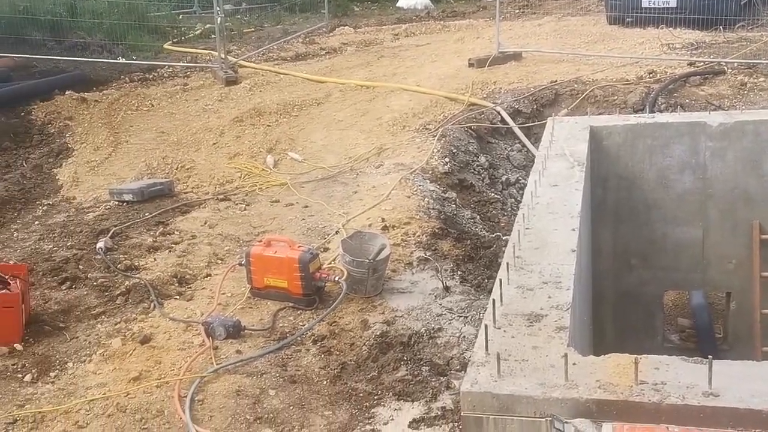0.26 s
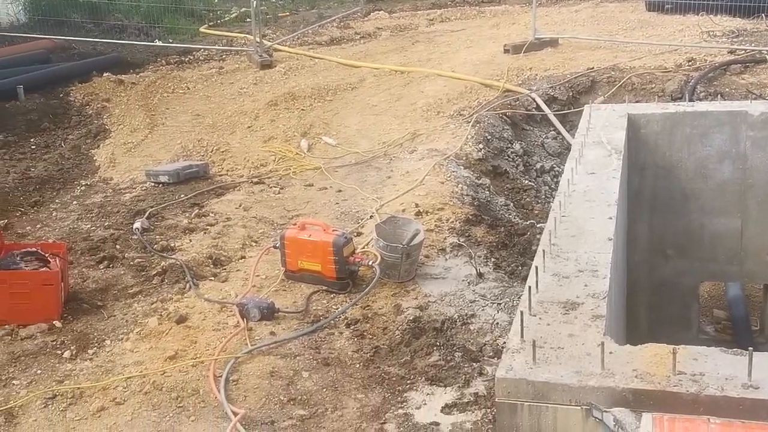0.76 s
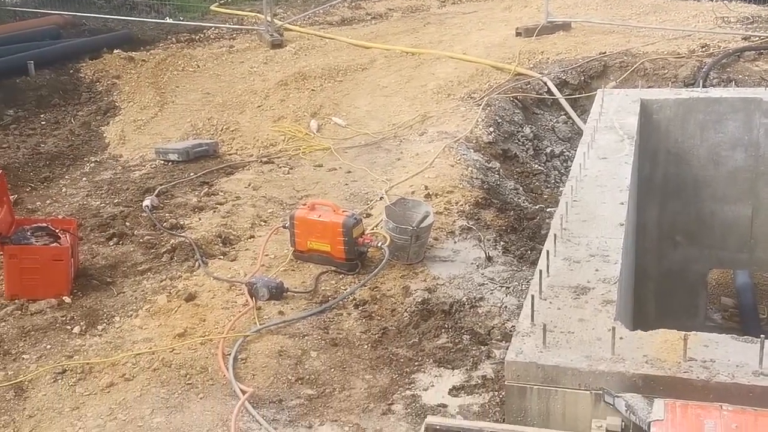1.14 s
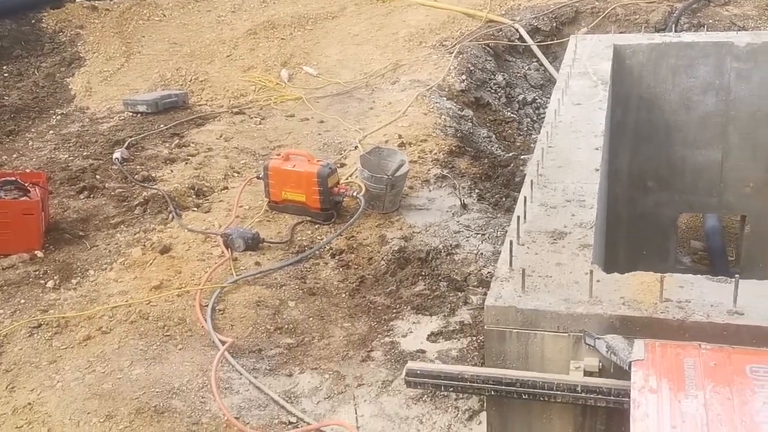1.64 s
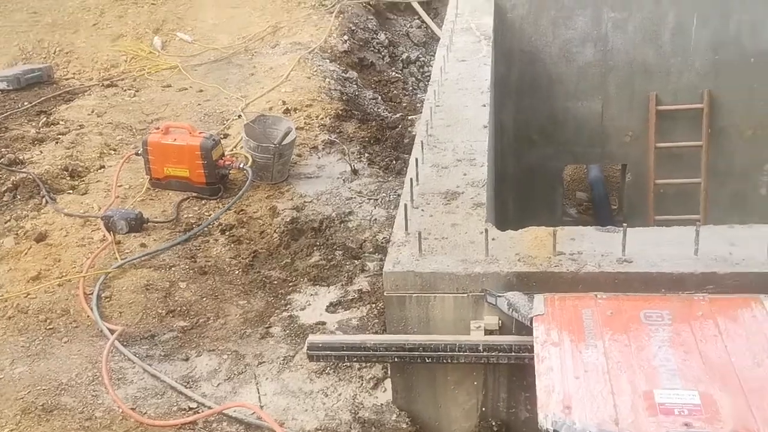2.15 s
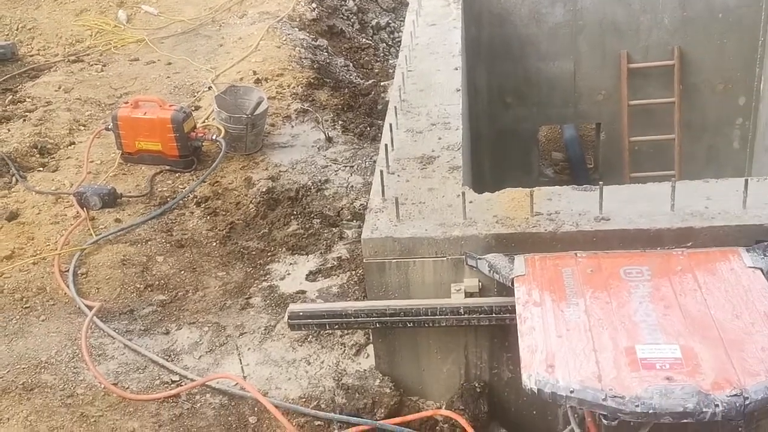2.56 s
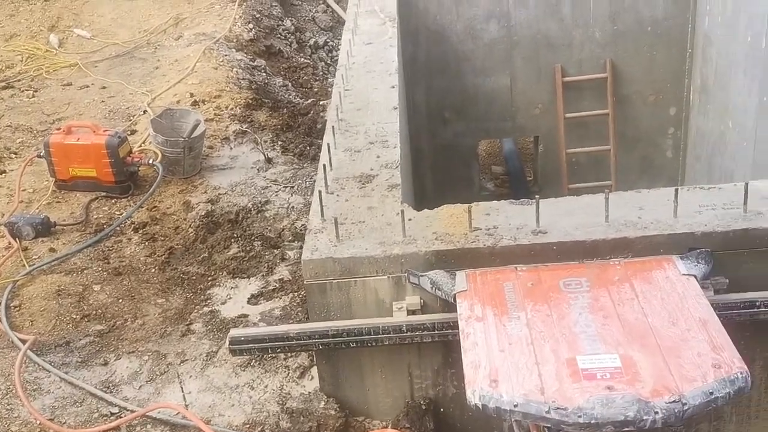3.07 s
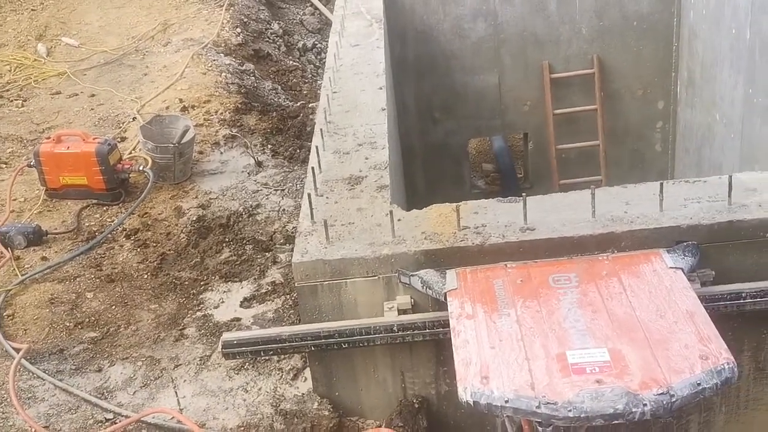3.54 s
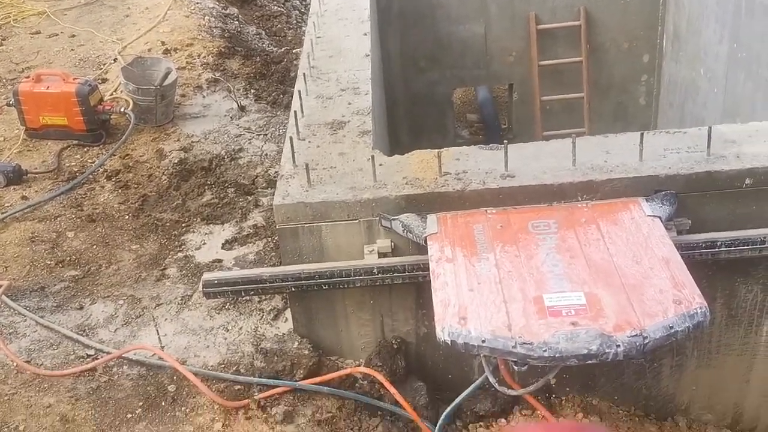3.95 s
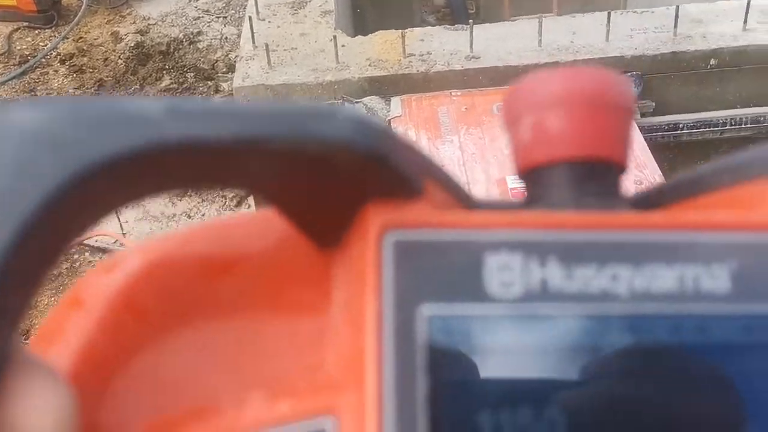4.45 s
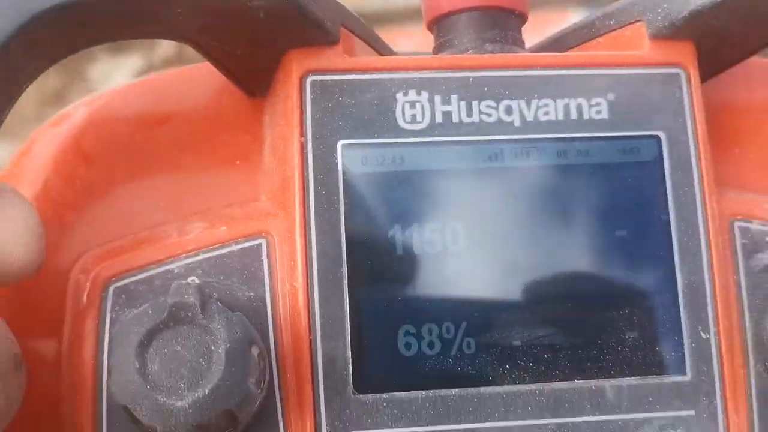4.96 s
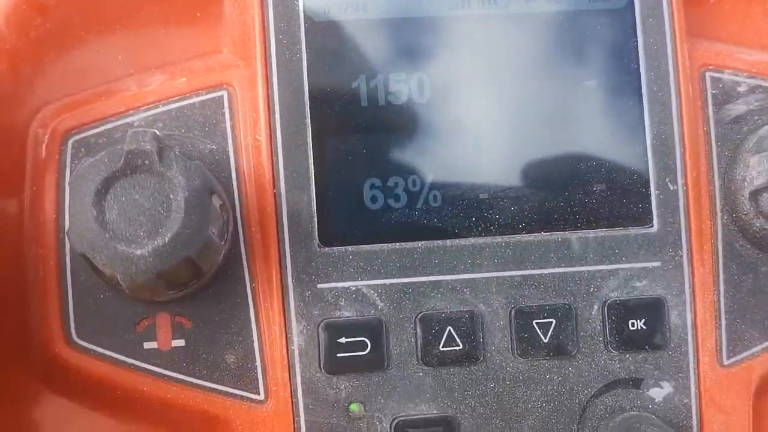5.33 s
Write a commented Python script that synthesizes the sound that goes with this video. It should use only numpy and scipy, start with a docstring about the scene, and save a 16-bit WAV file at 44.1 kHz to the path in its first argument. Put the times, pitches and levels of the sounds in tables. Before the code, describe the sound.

A powered wall saw is already cutting concrete and never stops. Its dense, bright grinding hiss is strongest in the upper mids, with thin metallic whines and a quick flutter about twenty times a second. Near two seconds it swells slightly under load with a few faint low clicks, then gradually eases, becoming more tonal and ringing. Outdoors, hand-held stereo phone, close and loud, slightly overloaded, with a barely audible low breeze.

```python
"""Outdoors, a wall saw cuts concrete, heard through the two ports of a hand-held phone.
The blade meets nearly the same grit every turn, so its hiss repeats with the rotation and rings in the steel.
Tones at whole multiples of the turn and a gear tone whine on top; a proud segment scrapes and pings each turn.
The loud hiss bends the microphones, which adds difference tones, low pulses and clicks. A low breeze lies beneath."""
import sys
import numpy as np
from scipy import signal
from scipy.fft import rfft, irfft, next_fast_len
from scipy.io import wavfile
from scipy.ndimage import uniform_filter1d

SR = 44100
rng = np.random.default_rng(int(sys.argv[2]) if len(sys.argv) > 2 else 0)


def output_pcm(signal):
    """Save a mono or channel-first signal as 16-bit PCM at the path in sys.argv[1].

    Samples are clipped to [-1, 1] before scaling.
    """
    pcm = np.clip(np.atleast_2d(signal).T, -1, 1) * 32767
    wavfile.write(sys.argv[1], SR, np.round(pcm).astype(np.int16))


def rack_gain(trim_db):
    """Turn a fader trim in dB into the linear factor to multiply a signal by."""
    fader = np.asarray(trim_db, float)
    return 10 ** (fader / 20)


N = 246959
T = np.arange(N) / SR  # time, s
FREE_TURNS_PER_S = 19.53  # blade speed without load


def read(hz, at_hz, values):
    """Spectral interpolation: straight lines between points on a log-frequency axis."""
    return np.interp(np.log(hz + 1), np.log(np.add(at_hz, 1)), values)


def evened(x):
    """Normalization of power: scales to rms 1."""
    return x / np.sqrt(np.mean(x ** 2))


def wander(rate_hz):
    """Low-frequency random modulation of rms 1: sines of random phase, the slower ones stronger."""
    steps = np.arange(0, N / SR + 1, .01)
    total = np.zeros(len(steps))
    for hz in np.geomspace(rate_hz / 8, rate_hz, num=24):
        total += np.sin(2 * np.pi * (hz * steps + rng.random())) / np.sqrt(hz)
    return np.interp(T, steps, evened(total))


# Course of the cut. Each row: time in seconds, level in dB, gear whine in dB.
RUN_LEVELS = [(0, -19.5, -40), (0.2, -20, -41.5), (0.9, -19.5, -41), (1.75, -19.5, -46), (1.92, -17.5, -47),
              (2.2, -18, -46.5), (2.4, -18, -48.5), (2.7, -18.5, -52), (3.5, -19.5, -66), (4.2, -20.5, -69),
              (4.6, -22, -51.5), (5.6, -23.5, -45.5)]


def run_level(column):
    """Amplitude envelope: one column of the run, interpolated sample by sample."""
    return np.interp(T, *np.transpose(RUN_LEVELS)[[0, column]])


# How the phone is held. Each row: time in seconds, number of the pose (0 to 3).
POSE_TIMES = [(0, 0), (1.7, 0), (1.95, 1), (2.6, 1), (3.15, 2), (4.0, 2), (4.55, 3), (5.6, 3)]


def pose_share(k):
    """Linear crossfade: how much of pose k is held at each moment, 0-1."""
    return np.maximum(1 - abs(np.interp(T, *np.transpose(POSE_TIMES)) - k), 0)


def pose_db(dbs):
    """Directional level: the dB of the four poses, crossfaded sample by sample."""
    return sum(pose_share(k) * db for k, db in enumerate(dbs))


# Phase between the ports. Each row: frequency in Hz, then the lead of the left port in radians in each pose.
PORT_LEADS = [(2300.0, -0.6, -0.2, -0.2, -0.1), (3200.0, -0.4, -0.1, -0.2, 0.3),
              (4200.0, 0.6, 0.7, 0.4, 1.3), (4800.0, 1.9, 1.3, 0.8, 1.2), (5300.0, 3.4, 4.1, -1.7, 1.9),
              (6200.0, 3.8, 4.3, -2.0, 1.3), (7000.0, 3.6, 4.2, -1.8, 0.2), (7600.0, 4.9, 5.4, -1.2, -0.0),
              (8300.0, 5.2, 5.6, -0.5, 0.1), (10500.0, 5.0, 6.1, -0.2, 1.9), (12500.0, 6.0, 6.5, 0.5, 2.9),
              (15000.0, 3.3, 6.3, 0.0, 3.1)]


def port_lead(hz, k):
    """Phase difference between two receivers: radians by which the left port leads in pose k."""
    return read(hz, *np.transpose(PORT_LEADS)[[0, k + 1]])


# Load drags the blade down. Each row: time in seconds, blade speed in turns per second.
BLADE_SPEED = [(0, 19.52), (0.5, 19.545), (1.1, 19.5), (1.8, 19.5), (2.25, 19.24), (2.45, 19.24),
               (2.75, 19.38), (3.5, 19.38), (4.06, 19.44), (5.6, 19.515)]


def blade_speed():
    """Rotation under load: turns per second at every sample."""
    return np.interp(T, *np.transpose(BLADE_SPEED))


def repeat():
    """Coherence between turns: the harder the load drags and shifts the speed, the less grit comes round again."""
    free, lost_per_sag2, lost_per_ramp = .76, 1.2, .3  # sag in turns/s, ramp in turns/s^2
    speed = uniform_filter1d(blade_speed(), size=4000)
    sag = FREE_TURNS_PER_S - speed
    ramp = abs(np.gradient(speed) * SR)
    loaded = free - lost_per_sag2 * sag ** 2 - lost_per_ramp * ramp
    settled = np.interp(T, [4.1, 4.5], [0, 1])  # the feed eases and the blade keeps to its groove
    return loaded + settled * (.95 - loaded)


def grit(turns, size=8192, count=820):
    """Cyclostationary noise: laid around the rim, each turn keeps part of the last turn's pattern."""
    rows = int(turns[-1]) + 2
    rim_spectra = rng.standard_normal((rows, count, 2)) @ [1, 1j]
    keep = np.clip(np.interp(np.arange(rows), turns, repeat()), .05, 1)
    fineness_of_bump = np.arange(1, count + 1) / 260
    keep = keep[:, None] ** fineness_of_bump ** .5  # coarse bumps outlast fine grit
    for k in range(1, rows):
        renewed = np.sqrt(1 - keep[k] ** 2) * rim_spectra[k]
        rim_spectra[k] = keep[k] * rim_spectra[k - 1] + renewed
    rim = irfft(rim_spectra, size).ravel()
    return evened(np.interp(turns * size, np.arange(len(rim)), rim))


# Spectrum of the breeze before scaling to rms 1. Each row: frequency in Hz, relative density in dB per Hz.
BREEZE_SPECTRUM = [(15, -19), (45, 3), (120, 0), (700, -20.5)]
# Course of the breeze. Each row: time in seconds, level in dB, left over right in dB.
BREEZE_LEVELS = [(0, -51, 10), (1.75, -52, -16), (1.9, -46, -14.5), (4.3, -47, -11.5), (4.6, -52, -3),
                 (5.6, -62, 9)]


def breeze():
    """Turbulent pressure noise: low random noise, independent at the two ports."""
    hz = np.fft.rfftfreq(N, 1 / SR)
    spectrum = rfft(rng.standard_normal((2, N))) * rack_gain(read(hz, *np.transpose(BREEZE_SPECTRUM)))
    s, level_db, pan_db = np.transpose(BREEZE_LEVELS)
    level_db = np.interp(T, s, level_db) + np.outer([.5, -.5], np.interp(T, s, pan_db))
    return rack_gain(level_db + 3.5 * wander(40)) * evened(irfft(spectrum, N))


# Low clicks. Each row: time in seconds, height of the pulse in dB before the port gains.
CLICKS = [(1.81, -30), (1.9, -22.5), (1.953, -25), (2.909, -22), (3.044, -22), (4.221, -27), (4.272, -23)]


def clicks():
    """Quadratic rectification: low clicks where loud peaks of the hiss bend the microphones, mostly the right."""
    half_width_s = 0.00032
    pulse = sum(rack_gain(db) * np.exp(-.5 * ((T - s) / half_width_s) ** 2) for s, db in CLICKS)
    return np.outer([.5, 1.4], uniform_filter1d(pulse, size=900) - pulse)  # slow part removed


# Low pulses, once a turn. Each row: time in seconds, pulse height in dB before the port gains.
LOW_PULSE_LEVELS = [(1.7, -60), (2.0, -44), (3.9, -41), (4.15, -36), (4.44, -35), (4.49, -50)]
# Pings of the steel. Each row: cycles per turn, lag in radians of turn, then peak in dB in each pose.
PINGS = [(67, 1.25, -49, -48, -41.5, -40), (129, 0.88, -47, -60, -47, -36), (195, 3.2, -50, -46, -47, -36)]
# Bright scrape. One row: peak in dB in each pose, before the port gains.
SCRAPE_LEVELS = [-36, -34, -35, -26.5]


def proud_segment(turns):
    """Periodic excitation: a proud segment scrapes and pings; its loud burst bends the microphones, a low pulse."""
    landing_s = 4.425  # one moment at which it lands
    angle = 2 * np.pi * (turns - np.interp(landing_s, T, turns))

    def once_a_turn(sharpness, lag=0):
        """Circular bell: a periodic pulse of height 1, narrower as sharpness grows."""
        return np.exp(sharpness * (np.cos(angle - lag) - 1))

    pulse_db = np.interp(T, *np.transpose(LOW_PULSE_LEVELS)) + 2.5 * wander(14)
    pulse = once_a_turn(45) * rack_gain(pulse_db)
    out = np.outer([.55, 1.4], uniform_filter1d(pulse, size=2200) - pulse)  # mostly in the right port
    for cycles, lag, *dbs in PINGS:
        ping_db = pose_db(dbs) + 1.2 * wander(10)
        tone = np.sin(cycles * angle + .5 * wander(2.95))
        out += rack_gain(ping_db) * once_a_turn(1.9, lag) * tone
    band = signal.butter(2, [5100, 6300], "band", fs=SR, output="sos")
    scrape = evened(signal.sosfilt(band, grit(turns)))
    scrape *= rack_gain(pose_db(SCRAPE_LEVELS)) * once_a_turn(2.5)
    return out + np.outer([1.5, .4], scrape)  # the scrape is mostly in the left port


def gear(turns):
    """Gear meshing: the main mesh tone, locked to the blade, swells and fades as the phone turns."""
    cycles_per_turn, left_over_right_db = 101.25, -8
    tone = np.sqrt(2) * np.sin(2 * np.pi * cycles_per_turn * turns + .4 * wander(16))
    pan_db = np.array([[.5], [-.5]]) * left_over_right_db
    return rack_gain(run_level(2) + 0.24 * wander(4.1) + pan_db) * tone


# Whole multiples of the turn that sound as tones. One row: cycles per blade turn of each tone.
WHINE_MULTIPLES = [36, 108, 144, 162, 173, 238, 288, 300, 305, 309, 351, 357]
# Strength of the same tones, one row a tone. Each row: peak in dB re the run level, in each pose.
WHINE_LEVELS = [(-38, -33, -31, -32.5), (-26, -28.5, -34, -42), (-27.5, -25, -31, -37),
                (-32, -33, -17.5, -21), (-42, -24.5, -31, -20), (-24, -21.5, -23, -16),
                (-32, -12, -25, -33), (-16.5, -24, -35, -35), (-16.5, -14, -35, -30), (-43, -15, -20, -21),
                (-36, -30, -17, -14), (-37, -17, -27, -18)]


def whine(turns):
    """Harmonics of the turn: gear, segments and blade ringing under repeating grit, wavering a little."""
    late_multiples = [300, 305]  # two tones swell in late
    out = np.zeros((2, N))
    for cycles, dbs in zip(WHINE_MULTIPLES, WHINE_LEVELS):
        hz = cycles * FREE_TURNS_PER_S
        lead = sum(pose_share(k) * port_lead(hz, k) for k in range(len(dbs)))
        phase = 2 * np.pi * cycles * turns + .5 * wander(8)
        level_db = pose_db(dbs) + 1.3 * wander(6.6)
        if cycles in late_multiples:
            level_db += np.interp(T, [.5, .8], [-25, 0])
        out += rack_gain(level_db) * np.sin([phase, phase - lead])
    return out


def patches(x, depth_db, wide=12, long=9):
    """Shifting interference: reflections change as the phone moves, so broad patches drift up and down."""
    z = signal.stft(x, nperseg=1024)[2]
    field = rng.standard_normal(z.shape[1:])
    for _ in range(2):
        field = uniform_filter1d(field, wide, 0)  # along frequency
        field = uniform_filter1d(field, long, 1)  # along time
    return signal.istft(z * rack_gain(depth_db * evened(field)), nperseg=1024)[1][:, :N]


# Spells of more wobble. Each row: middle in seconds, half length in seconds, added depth 0-1.
WOBBLE_SPELLS = [(0.05, 0.17, .12), (1.05, .22, 0.04), (1.8, 0.16, 0.14), (2.33, .15, 0.23),
                 (3.2, 0.14, 0.09), (4.1, 0.45, 0.19), (4.65, 0.24, 0), (5.152, 0.26, 0.14)]


def wobble(s):
    """Modulation depth: that of the once-a-turn swell at times s, from a small resting depth."""
    return 0.023 + sum(depth * np.exp(-((s - mid) / half) ** 2) for mid, half, depth in WOBBLE_SPELLS)


def throb(x, turns, spread=0.98, wide=7):
    """Amplitude modulation by runout: the blade is slightly untrue, so each band swells at its own angle."""
    _, s, z = signal.stft(x, SR, nperseg=512, noverlap=384)
    angle = evened(uniform_filter1d(rng.standard_normal(z.shape[1]), wide))
    angle = spread * angle[:, None]  # radians
    swell = 1 + wobble(s) * np.cos(2 * np.pi * np.interp(s, T, turns) - .3 + angle)
    return signal.istft(z * swell, nperseg=512, noverlap=384)[1][:, :N]


# Colour of the hiss, one table a pose, scaled later to rms 1.
# Each row: frequency in Hz, left in relative dB, right in relative dB, left-right likeness 0-1.
POSE_SPECTRA = [
    [(200.0, -17.5, -11.5, 0.03), (960, -20.5, -24, 0.16), (2350, -15.5, -14.5, 0.4), (3080, -6, -3, 0.77),
     (3970, -4.5, -3, 0.65), (4840, 1.5, -10.5, 0.25), (5330, 4, 0, 0.6), (6100, 3.5, 1, 0.7),
     (6760, -1, 4, 0.86), (7530, -2, 2, 0.46), (8080, -17, -12, 0.14), (10600, -21, -14.5, 0.26),
     (12700, -28, -23, 0.36), (15000.0, -28, -35, 0.4)],
    [(200.0, -13.5, -7.5, 0), (990, -20, -21, 0.07), (2300.0, -12, -10.5, 0.73), (3270, -5.5, -1, 0.67),
     (4160, -4, -4.5, 0.67), (4830, 0.5, -7, 0.35), (5300, 5, -3, 0.35), (6000, 3.5, 0.5, 0.78),
     (6870, 0.5, 6.5, 0.57), (7500, -4.5, 3, 0.14), (8340, -14.5, -12, 0.5), (10700, -21, -13.5, 0.58),
     (12500.0, -25, -22.5, 0.44), (15000.0, -31, -39, 0.4)],
    [(200.1, -18.5, -5, 0.13), (1000.0, -16.5, -15, 0.54), (2390, -16, -8.5, 0.27), (3350, -4, 0.5, 0.92),
     (4200.0, -4.5, -2, 0.43), (4870, 0, -14, 0.3), (5110, 4, -0.5, 0.74), (6300, 0, 0.5, 0.72),
     (7080, 0, 7.5, 0.24), (7660, -10, 3.5, 0), (8370, -14.5, -12.5, 0.66), (10270, -21, -12, 0.53),
     (12500.0, -30, -20, 0.31), (15000.0, -26, -42, 0.5)],
    [(200.0, -20, -18, 0.3), (920, -27.5, -27, 0.93), (2300, -12.5, -12.5, 0.65), (3140, -7, -0.5, 0.7),
     (4350, -4, 0.5, 0.85), (4800, 0.5, -3.5, 0.35), (5360, 6, 2.5, 0.16), (6160, 1.5, -1, 0.17),
     (7040, -2, 1, 0.48), (7580, -0.5, -4.5, 0.77), (8270, -14, -7.5, 0.7), (10650, -18.5, -8.5, 0.4),
     (12500.0, -23, -16, 0.2), (15000.0, -24, -30, 0.1)],
]
# Blade and guard resonances. Each row: frequency in Hz, width in Hz, then dB above the hiss in each pose.
BLADE_MODES = [(300, 47, -2, 1, -9, 14.5), (670, 36, -2, 12, 8.5, 17.5), (1244, 117, 10, 8.5, 7, 17),
               (2012, 31, 12, 4, -3, 13.5), (2480, 84, -14, -22, 1, 6), (3114, 19, 1.5, -6, 3.5, 11),
               (3355, 48, 3.5, 8, 3.5, 7.5), (3648, 20, 9.5, 8, 5, 13), (3893, 76, 2, 5.5, 0, 7.5),
               (4060, 81, 4.5, 2.5, 6, 7), (4504, 55, 7, 10.5, 7, 5), (4650, 32, 7, 6, 7, 8.5),
               (4896, 31, 7, 6, 5.5, 10), (5230, 30, 3.5, -5, -9, 3), (5520, 44, 6.5, 7.5, 6, 4),
               (5820, 28, 8, 10.5, 6, 9), (5966, 46, 7, 11, 7.5, 10.5), (6220, 22, -18, 11, 9.5, 9.5),
               (6320, 16, 2, 8, 12, 8), (6612, 59, 11.5, 4.5, -1, 4), (6760, 45, 5.5, 7, 7.5, 4),
               (6943, 65, 6, -0.5, 5.5, 12.5), (7020, 32, 5.5, 9, -3, -11), (7230, 82, 0, 4, 5.5, 10.5),
               (7610, 33, 8.5, 6, -6, 9), (7850, 28, 6.5, 3, 8.5, 12), (11000, 40, 11, 1, 9, -5)]


def blade_ring(hz, k):
    """Modal resonance: resonant power peaks added to a flat floor, for pose k; negative dB makes a dip."""
    power = 1
    for mode_hz, width_hz, *dbs in BLADE_MODES:
        power = power + (rack_gain(2 * dbs[k]) - 1) / (1 + (2 * (hz - mode_hz) / width_hz) ** 2)
    return np.sqrt(power)


def hiss(turns):
    """Forced vibration: grit excites the blade's resonances and reaches the ports as each pose colours it."""
    size = next_fast_len(N)
    hz = np.fft.rfftfreq(size, 1 / SR)
    direct, *scattered = (rfft(grit(turns), size) for _ in range(3))
    spray = rfft(rng.standard_normal((2, size)))
    loose = read(hz, [7000, 11000], [.2, .7])  # slurry spray never repeats, and rules the treble
    diffuse = np.sqrt(1 - loose) * np.array(scattered) + np.sqrt(loose) * spray
    ripple = uniform_filter1d(uniform_filter1d(rng.standard_normal(len(hz)), 450), 450)
    ripple_db = evened(ripple) * read(hz, [7000, 9000], [0, 3])
    ripple = rack_gain(ripple_db)  # many close treble modes and housing reflections
    out = np.zeros((2, N))
    for k, pose in enumerate(POSE_SPECTRA):
        at_hz, *columns = np.transpose(pose)
        left_db, right_db, same = (read(hz, at_hz, column) for column in columns)
        same = np.clip(same, 0, 1)
        lagged = direct * np.exp(-1j * np.outer([0, 1], port_lead(hz, k)))
        ports = np.sqrt(same) * lagged + np.sqrt(1 - same) * diffuse
        ports *= blade_ring(hz, k) * ripple * rack_gain(np.array([left_db, right_db]))
        out += pose_share(k) * evened(irfft(ports, size)[:, :N])
    return throb(patches(out, depth_db=0.54), turns)


def scene():
    """Superposition: the saw under its level curve, over the breeze and low clicks."""
    turns = np.cumsum(blade_speed()) / SR
    background = breeze() + clicks()
    saw = rack_gain(run_level(1)) * (hiss(turns) + whine(turns))
    return background + proud_segment(turns) + gear(turns) + saw


# Second-order bending of the microphones. One row: left, right, per unit of signal.
MIC_BENDING = [-0.68, -1.39]


def bent(dry):
    """Quadratic distortion: peaks are squeezed softly, then each microphone adds the low-passed square."""
    squeezed = 0.63 * np.tanh(dry / 0.61)
    lowpass = signal.butter(3, 4500, fs=SR, output="sos")
    square = signal.sosfilt(lowpass, squeezed ** 2)
    square -= uniform_filter1d(square, 4000, axis=1)  # offset removed
    return squeezed + np.array(MIC_BENDING)[:, None] * square


def top_cut(x):
    """Nothing passes above the cut-off."""
    return signal.sosfilt(signal.butter(12, 15170, fs=SR, output="sos"), x)


def record(dry):
    """Transduction: the two microphones bend the sound they take in."""
    mix = bent(dry)
    return top_cut(mix)


dry = scene()
out = record(dry)
output_pcm(out)
```